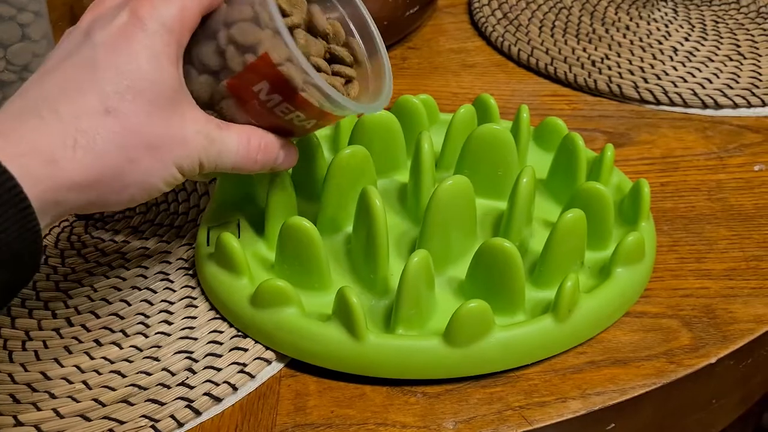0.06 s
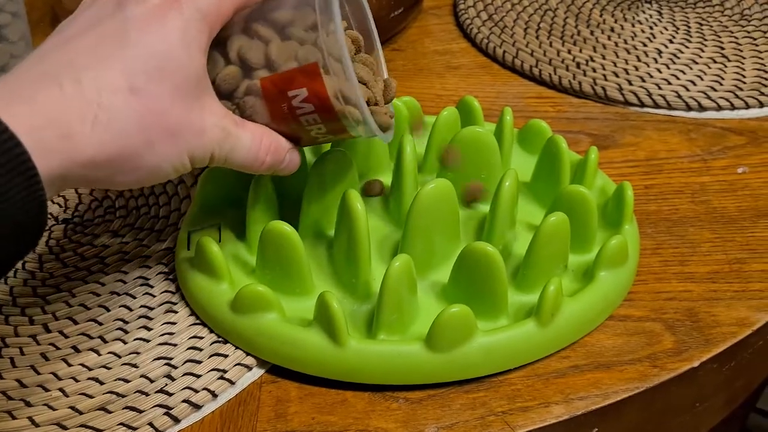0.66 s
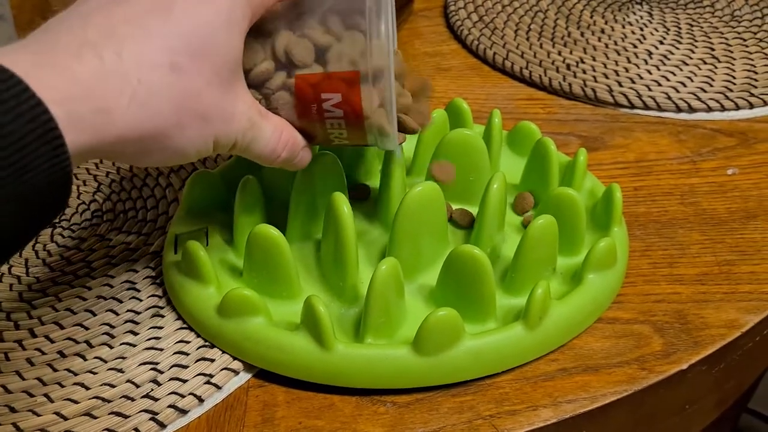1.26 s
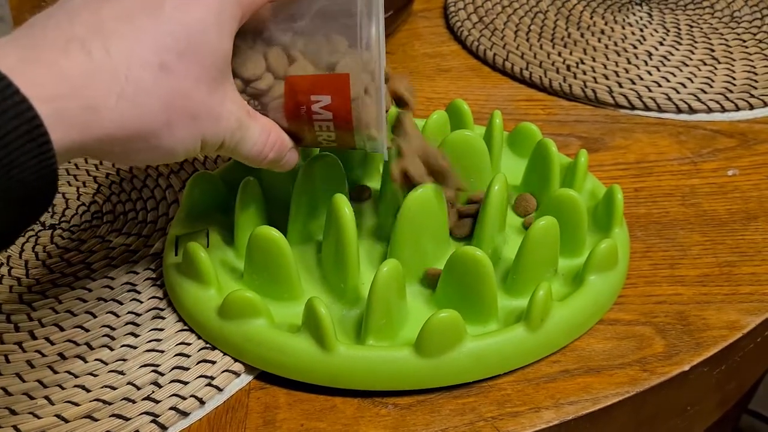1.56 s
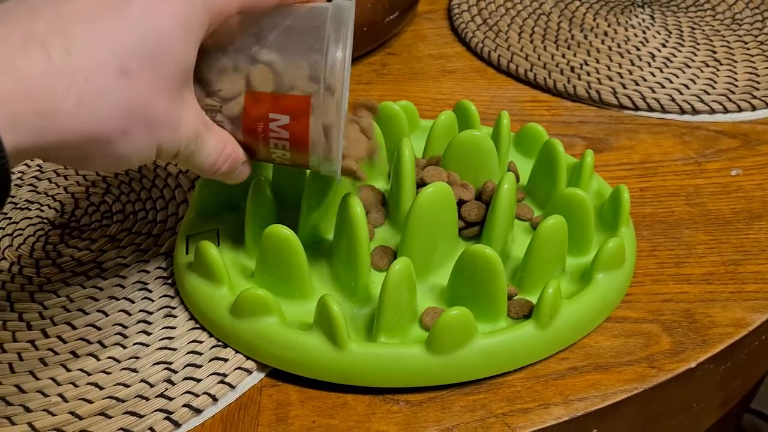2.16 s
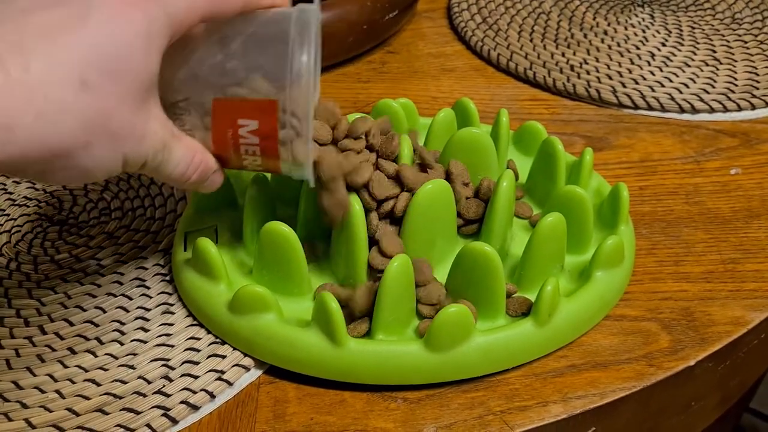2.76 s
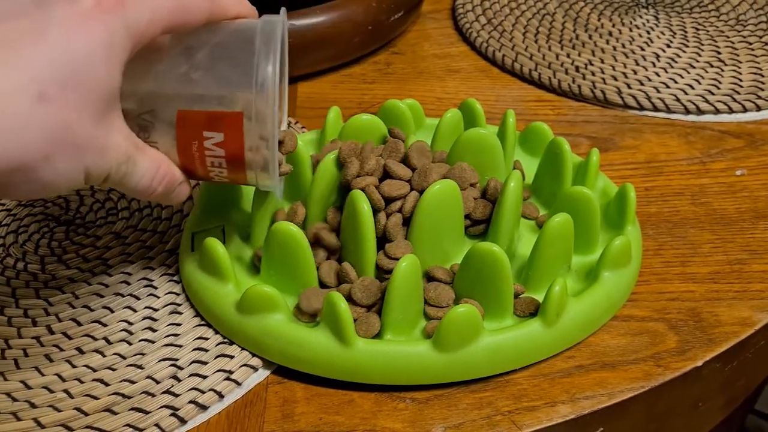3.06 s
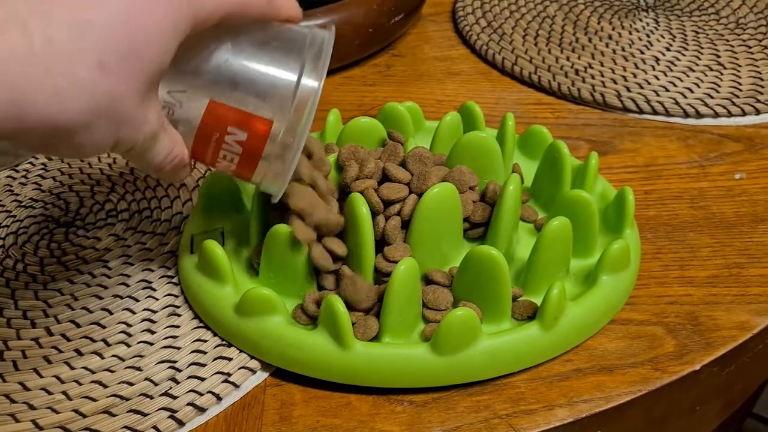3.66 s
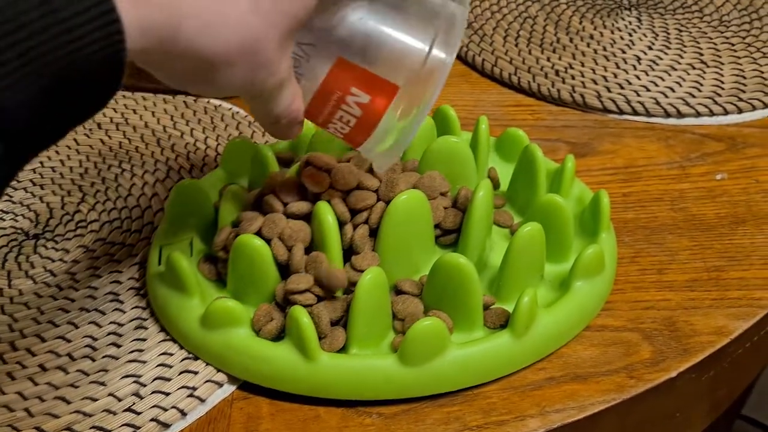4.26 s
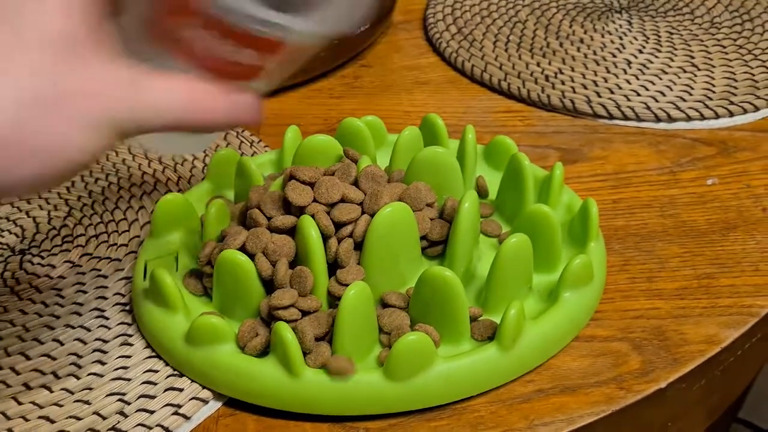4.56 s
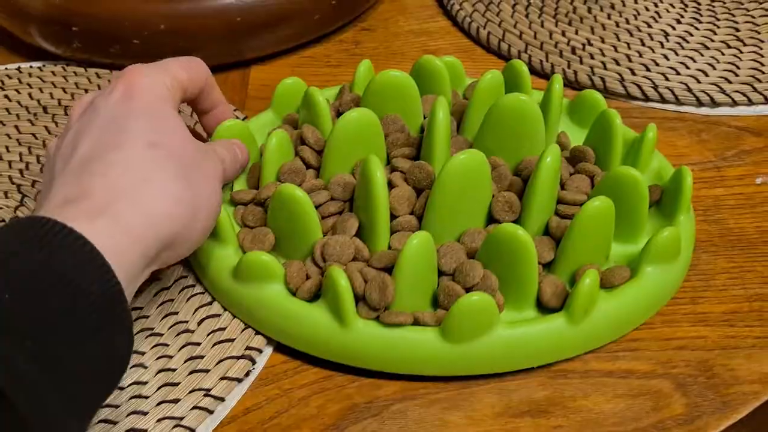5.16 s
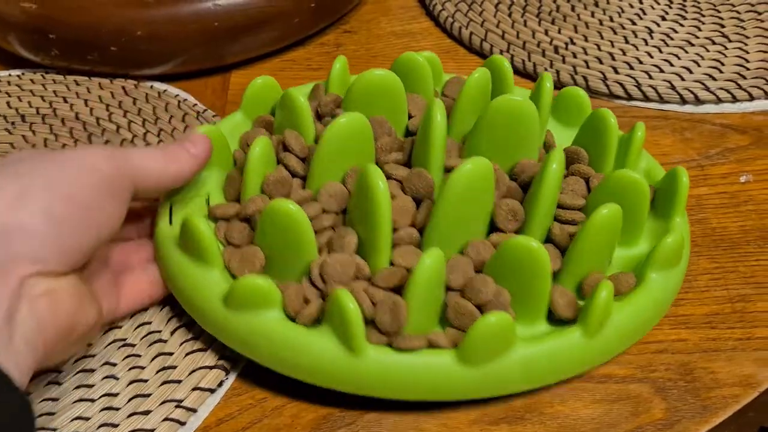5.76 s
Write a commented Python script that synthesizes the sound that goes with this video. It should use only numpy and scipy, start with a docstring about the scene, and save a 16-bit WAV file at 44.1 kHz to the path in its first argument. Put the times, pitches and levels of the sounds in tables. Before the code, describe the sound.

Dry kibble is tipped from a thin plastic tub into a ribbed plastic bowl on a wooden table. A few pieces clack and bounce first, then several gushes merge into a dense, rattling patter with light hollow thuds. The flow stops, stray pieces click, the tub snaps once, and a hand faintly scrapes the bowl along. The sound is close, in stereo, in a small quiet room.

```python
"""Dry kibble pours in gushes from a thin plastic tub into a ribbed plastic bowl on a wooden table.
Hundreds of impacts a second merge into a patter, over which single pieces clack and excite the modes
of the plastic. Those that strike the floor of the bowl make it thud, until the growing heap damps it.
The tub wall snaps, the last pieces rattle, and a hand shifts the bowl with a stick-slip scrape.
Two close microphones pick this up, together with the reverberation of a small room."""
import sys
import numpy as np
from scipy import signal
from scipy.fft import rfft, irfft, next_fast_len
from scipy.io import wavfile
from scipy.ndimage import uniform_filter1d, minimum_filter1d

SR = 44100
rng = np.random.default_rng(int(sys.argv[2]) if len(sys.argv) > 2 else 0)


def to_wav(s):
    """Save 16-bit WAV."""
    ch = np.atleast_2d(s).T  # columns
    pcm = np.round(np.clip(ch, -1, 1) * 32767)  # PCM
    wavfile.write(sys.argv[1], SR, pcm.astype(np.int16))


N = 264501
TIME = np.arange(N) / SR
SAMPLES_PER_MS = SR / 1000  # impact levels state the energy as if spread over 1 ms


def amp(db):
    """Amplitude ratio of a level in decibels."""
    return 10 ** (np.asarray(db) / 20)


def unit_rms(x):
    """Normalisation to a mean power of 1."""
    return x / np.sqrt(np.mean(x ** 2) + 1e-30)


def unit_energy(x):
    """Normalisation to a mean energy of 1 per channel."""
    return unit_rms(x) / np.sqrt(x.shape[-1])


def curve_at(points, hz):
    """Interpolation on a logarithmic frequency axis."""
    frequencies, values = np.transpose(points)
    return np.interp(np.log(hz + 1), np.log(frequencies + 1), values)


def add(mix, start_s, sound):
    """Superposition: a stereo sound adds to the mix from its start time."""
    part = mix[:, max(round(start_s * SR), 0):][:, :sound.shape[1]]
    part += sound[:, :part.shape[1]]


def convolve(x, response):
    """A linear system convolves its input with its impulse response."""
    return signal.oaconvolve(x, response, axes=1)[:, :N]


def minimum_phase(gain_db):
    """Causality: folding the cepstrum onto positive time gives a gain curve its phase."""
    cepstrum = irfft(np.log(amp(np.maximum(gain_db, -100))))
    half = len(cepstrum) // 2
    cepstrum[1:half] *= 2
    cepstrum[half + 1:] = 0
    return np.exp(rfft(cepstrum))


def impulses(per_s, spread_db):
    """A Poisson process of impulses, many small and a few large."""
    height = amp(spread_db * np.minimum(rng.exponential(1, N), 3))
    return height * (rng.random(N) < per_s / SR)


# level difference between the microphones: (frequency [Hz], left minus right [dB])
BALANCE = [(100, -2.5), (400, -1), (800, -1.5), (1300, -1), (2400, -9), (4400, -9.5), (7000, -6.5),
           (15000, -8)]
RIGHT_DELAY_S = 0.0001
def microphone_pair(spectra, hz, coherence):
    """Spaced microphones receive partly coherent signals that differ in level and arrival time."""
    shared = np.clip(curve_at(coherence, hz), -1, 1)
    left = shared * spectra[1] + np.sqrt(1 - shared ** 2) * spectra[0]
    right = spectra[1] * np.exp(-2j * np.pi * hz * RIGHT_DELAY_S)
    balance = amp(curve_at(BALANCE, hz))
    return np.array([left * balance, right]) * np.sqrt(2 / (1 + balance ** 2))


# likeness of the room's field at the two microphones: (frequency [Hz], coherence [0-1])
ROOM_COHERENCE = [(100, 0.53), (300, 1), (650, 0.64), (1400, 0.67), (3000, 0.73), (8000, 0)]
def room_noise(colour):
    """Spectral shaping: white noise takes on a colour and the coherence of the room, at rms 1."""
    padded = next_fast_len(N)
    hz = np.fft.rfftfreq(padded, 1 / SR)
    white = microphone_pair(rfft(rng.standard_normal((2, N)), padded), hz, ROOM_COHERENCE)
    return unit_rms(irfft(white * amp(curve_at(colour, hz)))[:, :N])


# background of the still room: (frequency [Hz], relative level [dB])
AIR_SPECTRUM = [(20, -5.5), (110, 4), (300, 4), (600, -10), (1200, -0.5), (3000, -14.5), (7000, -12.5),
                (9000, -28), (16000, -21.5)]
def room_air():
    """Stationary noise forms the floor beneath all other sounds."""
    return amp(-68.5) * room_noise(AIR_SPECTRUM)


# reverberation time: (frequency [Hz], T60 [s])
ROOM_DECAY = [(200, 0.15), (600, 0.33), (1500, 0.51), (3000, 0.5), (6500, 0.28), (10000, 0.063),
              (16000, 0.81)]
# colour of the reverberant tail: (frequency [Hz], gain [dB])
TAIL_SPECTRUM = [(200, -2), (600, 1.5), (1300, -8), (3000, -10), (6500, -4.5), (12000, -6.5)]
def echoes(size=16384):
    """Impulse response: early reflections from table and bowl, then an exponentially decaying tail."""
    t, hz = np.arange(size) / SR, np.fft.rfftfreq(size, 1 / SR)
    arrived = t > .003
    taps = rng.standard_normal((2, size)) * (rng.random((2, size)) < .12) * arrived
    band_hz, frame_s, bands = signal.stft(taps, SR, nperseg=256)
    decay = amp(-60 * frame_s / curve_at(ROOM_DECAY, band_hz)[:, None])
    tail = signal.istft(bands * decay, SR, nperseg=256)[1][:, :size]
    early = rng.standard_normal((2, size)) * arrived * np.exp(-t / .011)
    spectra = rfft(unit_energy(tail)) * amp(curve_at(TAIL_SPECTRUM, hz))
    spectra += amp(-6.5) * rfft(unit_energy(early))
    return irfft(microphone_pair(spectra, hz, ROOM_COHERENCE))


def reverberation(x, patterns=3, changes_per_s=19):
    """Echo paths depend on source position: pieces land all over the bowl, so patterns crossfade."""
    spot = TIME * changes_per_s
    wet = np.zeros((2, N))
    for k in range(patterns):
        distance = abs((spot - k + patterns / 2) % patterns - patterns / 2)
        share = np.cos(np.pi / 2 * np.minimum(distance, 1))
        wet += convolve(x[1:] * share, echoes())
    return wet * amp([[-.6], [-2.1]])


# response of the wooden table top: (frequency [Hz], relative level [dB])
TABLE_SPECTRUM = [(20, -24.5), (60, -7.5), (110, -12.5), (137, 4), (175, -24.5), (240, -2.5), (320, -17.5)]
def table_murmur():
    """Forced vibration: the table top murmurs in proportion to the flow of kibble."""
    return amp(-26.0) * room_noise(TABLE_SPECTRUM) * flow()


# colour of friction: (frequency [Hz], relative level [dB])
FRICTION_SPECTRUM = [(3300, 2), (4300, -2.5), (6800, -2.5), (8500, -12), (15000, -2)]
# the hand shoves the bowl: (midpoint [s], scrape length [s], scrape level [dB], judder level [dB])
SHOVES = [(4.95, 0.1, -55.5, -68), (5.471, 0.11, -54.5, -70), (5.688, 0.18, -59.5, -70.5),
          (5.808, 0.16, -55.5, -67)]
# low table rumble under the heavy pour (two rows), then rubs and rustles of sleeve, hand and tub:
# (midpoint [s], length [s], level [dB], centre [Hz], half width [octaves])
RUMBLES_AND_RUBS = [(2.477, 0.46, -58, 89.6, 1.2), (2.62, 0.13, -57, 45.6, 0.48),
                    (3.341, 0.072, -42, 1110, 0.69), (4.389, 0.042, -45.5, 660, 1.94),
                    (4.486, 0.063, -51, 606, 1.9), (5.195, 3.4, -70, 388, 0.58),
                    (4.991, .13, -64, 2990, 0.094), (5.263, 0.31, -68.5, 2320, 0.13),
                    (5.434, 0.25, -65.5, 3140, 0.14), (5.461, 2.6, -66.5, 4750, 1.66),
                    (5.805, 0.048, -56.5, 717, 0.096)]
SCRAPE_HZ, SCRAPE_OCTAVES, JUDDER_HZ, JUDDER_OCTAVES = 2480, 1.87, 98, 0.27
def rumble_and_rubbing():
    """Resonance shapes grainy noise into table rumble and the tiny slips of stick-slip friction."""
    out = np.zeros((2, N))
    grains = rng.standard_normal((2, N)) * (0.51 + impulses(per_s=900, spread_db=5.0))
    scrapes = [(middle, length, db, SCRAPE_HZ, SCRAPE_OCTAVES) for middle, length, db, _ in SHOVES]
    judders = [(middle, 2 * length, db, JUDDER_HZ, JUDDER_OCTAVES) for middle, length, _, db in SHOVES]
    for middle, length, db, centre_hz, octaves in RUMBLES_AND_RUBS + scrapes + judders:
        size, start = int(length * SR), middle - length / 2
        padded = next_fast_len(size)
        hz = np.fft.rfftfreq(padded, 1 / SR)
        resonance = (1 + (np.log2((hz + 1) / centre_hz) / octaves) ** 2) ** -1.4
        spectra = microphone_pair(rfft(grains[:, round(start * SR):], padded), hz, ROOM_COHERENCE)
        band = irfft(spectra * resonance * amp(curve_at(FRICTION_SPECTRUM, hz)), padded)[:, :size]
        add(out, start, amp(db) * unit_rms(band) * np.sin(np.linspace(0, np.pi, size)))
    return out


# likeness of the direct sound at the two microphones: (frequency [Hz], coherence [0-1])
DIRECT_COHERENCE = [(100, .7), (300, 0.96), (700, 1), (1400, 0.87), (3000, 0.13), (7000, 0.051),
                    (15000, 0.71)]
def radiated(force, body_db):
    """Source and filter: a brief force radiates through the response of a body, at energy 1."""
    size = force.shape[1]
    spectra = microphone_pair(rfft(force), np.fft.rfftfreq(size, 1 / SR), DIRECT_COHERENCE)
    fade = np.hanning(2 * size)[size:]
    return unit_energy(irfft(spectra * minimum_phase(body_db)) * fade)


# colour of a snap: (frequency [Hz], relative level [dB])
SNAP_SPECTRUM = [(100, -59.5), (400, -23), (1200, -7.5), (3500, -2), (5200, -1), (6500, 2.5), (8000, -12),
                 (11000, -12.5), (15000, -28)]
# the tub wall snaps under the fingers: (time [s], level [dB])
SNAPS = [(0.1187, -27), (0.5497, -24), (4.5984, -16.5), (4.8823, -35.5), (4.942, -30)]
def wall_snaps(size=1024):
    """Snap-through buckling: the thin wall flips in an instant and radiates one bright impulse."""
    impulse = np.zeros((2, size))
    impulse[:, 16] = 1
    crack = radiated(impulse, curve_at(SNAP_SPECTRUM, np.fft.rfftfreq(size, 1 / SR)))
    out = np.zeros((2, N))
    for start, db in SNAPS:
        add(out, start, amp(db) * crack)
    return out * np.sqrt(SAMPLES_PER_MS)


def ringing(drive, modes, size=12000):
    """Modal response: a shell rings as a sum of damped sinusoids, scaled to the rms of its drive."""
    t = np.arange(size) / SR
    response = sum(amp(db - 60 * t / t60) * np.sin(2 * np.pi * hz * t) / np.sqrt(t60)
                   for hz, db, t60 in modes)
    return unit_rms(convolve(drive, response[None])) * np.sqrt(np.mean(drive ** 2))


# modes of the bowl: (frequency [Hz], relative energy [dB], T60 [s])
BOWL_MODES = [(313, 6, .26), (338, -2, .16), (412, -5, .16), (521, -5, .18), (629, -7, .22), (785, -3, .16),
              (863, -5, .14)]
def bowl(thuds):
    """Resonance: the low modes of the bowl prolong each thud."""
    return amp(-4.0) * thuds + amp(-8.5) * ringing(thuds, BOWL_MODES)


# modes of the tub: (frequency [Hz], relative energy [dB], T60 [s])
TUB_MODES = [(1153, -21, 0.11), (1280, 3, 0.083), (1334, 15.5, 0.058), (1670, -28, 0.065),
             (2810, 13.5, 0.17), (3140, -13.5, .08)]
def tub(clatter):
    """Resonance: the high, short-lived modes of the tub colour the clatter."""
    return clatter + amp(-16.0) * ringing(clatter, TUB_MODES)


def contact(colour, time_constant_s, pitch_hz=None, octaves=.75, size=1024):
    """Rough contact: a noisy force swells and dies in milliseconds; the spot struck favours a pitch."""
    t, hz = np.arange(size) / SR, np.fft.rfftfreq(size, 1 / SR)
    age = t / time_constant_s
    swell = age ** 2 * np.exp(-age) + .07 * np.exp(-age / 4)
    body_db = curve_at(colour, hz)
    if pitch_hz:
        body_db -= 20 * np.log10(1 + (np.log2((hz + 1) / pitch_hz) / octaves) ** 2)
    return radiated(rng.standard_normal((2, size)) * swell, body_db)


def ping(pitch_hz, cycles, size=1024):
    """Damped oscillation: the struck rib or wall rings for a few cycles."""
    t, balance = np.arange(size) / SR, amp(curve_at(BALANCE, pitch_hz))
    phase = 2 * np.pi * (pitch_hz * (t + np.array([[RIGHT_DELAY_S], [0]])) + rng.random())
    attack = (1 - np.exp(-t / 0.0017)) ** 2
    motion = np.sin(phase) * attack * np.exp(-t * pitch_hz / cycles)
    pressure = np.gradient(motion, axis=1)  # a small surface radiates little bass
    return unit_energy(np.array([[balance], [1]]) * pressure)


# colours of a piece's body, its edge and the bowl's floor: (frequency [Hz], relative level [dB])
CLACK_SPECTRUM = [(120, -56.5), (300, -26.5), (500, -12), (750, -14), (980, -13.5), (1270, 0), (1650, -0.5),
                  (2100, -1), (2650, 0), (3300, 0), (4200, -10), (5500, -14), (9000, -28.5)]
TICK_SPECTRUM = [(2000, -42), (3800, -16), (4600, -4), (5500, 0), (6800, -3), (8200, -17), (11000, -21),
                 (16000, -30)]
THUD_SPECTRUM = [(60, -56), (200, -23.5), (283, -33.5), (305, 0.5), (420, 6.5), (560, -3), (800, 4),
                 (1400, -25.5)]
# pieces hit tub, ribs or heap, and at 2.53 s the tub's rim bumps a rib of the bowl: # (time [s], clack level
# [dB], pitch [Hz], tick level [dB])
KNOCKS = [(0.2206, -13.5, 1460, -24.5), (0.2439, -15, 1360, -34.5), (0.2817, -25.5, 1450, -35.5),
          (0.4184, -28, 1420, -47.5), (0.4665, -13.5, 2630, -31), (0.4968, -12, 3164, -31),
          (0.611, -17.5, 2430, -33), (0.6477, -6, 1707, -17.5), (0.7077, -14, 2560, -25.5),
          (0.9255, -29, 2610, -35), (0.9761, -29.5, 1180, -53), (1.021, -35, 2680, -63),
          (1.2524, -8.5, 2630, -17.5), (1.3149, -19.5, 1250, -28), (1.45, -10.5, 3450, -13.5),
          (1.5448, -10.5, 3304, -23), (1.5652, -10.5, 2416, -20), (1.6633, -8.5, 2910, -18.5),
          (1.7346, -13.5, 2620, -26), (1.7794, -16, 1308, -30), (1.932, -27.5, 2560, -56.5),
          (1.994, -25, 1630, -22.5), (2.0697, -26, 3175, -26), (2.151, -16.5, 1630, -31.5),
          (2.2393, -13, 3450, -22.5), (2.247, -17.5, 2500, -23.5), (2.297, -6, 2513, -6.5),
          (2.362, -11.5, 1690, -21), (2.5303, -9, 785, -39), (2.5421, -13, 2560, -17.5),
          (2.564, -7.5, 2426, -15.5), (2.6469, -9.5, 2460, -25.5), (2.6648, -21.5, 1670, -14.5),
          (2.8496, -11.5, 2930, -12), (2.9281, -11, 2840, -31.5), (3.0322, -17, 3000, -21),
          (3.082, -18.5, 1670, -27.5), (3.1933, -33, 1950, -42), (3.4351, -18, 2500, -25),
          (3.6337, -13.5, 3130, -25), (3.7616, -17.5, 2690, -25), (3.9055, -15.5, 2910, -29),
          (3.9635, -14.5, 1810, -24), (4.1013, -32.5, 1660, -64), (4.1605, -30, 1840, -37.5),
          (4.215, -17.5, 2976, -35), (4.229, -12.5, 2490, -29), (4.32, -29.5, 3140, -42.5),
          (4.327, -23.5, 1450, -62), (4.5119, -35, 1547, -50.5), (4.5793, -32, 2560, -43.5),
          (4.6912, -35, 2510, -51), (4.7864, -41, 1257, -67)]
# pieces hit the bare floor of the bowl: (time [s], clack level [dB], pitch [Hz], thud level [dB])
LANDINGS = [(0.5289, -10.5, 1340, -20.5), (0.6456, -8, 1625, -15.5), (0.7333, -5, 2450, -19),
            (0.7376, -24.5, 1870, -19), (0.7557, -16, 2160, -24), (0.8462, -14, 2540, -24),
            (0.865, -21, 2340, -26.5), (1.3303, -11.5, 3195, -22), (1.385, -9.5, 1740, -20),
            (1.4391, -11.5, 2800, -22.5), (1.4947, -17.5, 2860, -27.5), (1.5516, -11, 1640, -22),
            (1.5939, -12, 2580, -21), (1.6936, -17, 2610, -28), (2.0142, -16, 1192, -27.5),
            (2.18, -16, 1616, -27)]
# the hard edges of two pieces meet: (time [s], level [dB])
EDGE_TICKS = [(0.5485, -19), (1.141, -32), (1.4, -18.5), (1.827, -19), (2.2295, -18), (2.2868, -12.5),
              (2.4168, -17.5), (2.4275, -12), (2.9587, -15.5), (3.57, -17.5)]
KNOCK_THUD_DB, LANDING_TICK_DB = -30, -12.5  # relative to the clack
def single_impacts():
    """Impact sound: each loud piece gives a clack, a tick and a thud; edges alone only tick."""
    clatter, thuds = np.zeros((2, 2, N))
    knocked = [(start, db, hz, tick_db, db + KNOCK_THUD_DB) for start, db, hz, tick_db in KNOCKS]
    landed = [(start, db, hz, db + LANDING_TICK_DB, thud_db) for start, db, hz, thud_db in LANDINGS]
    for start, clack_db, pitch_hz, tick_db, thud_db in knocked + landed:
        clack = contact(CLACK_SPECTRUM, 0.00056, pitch_hz, octaves=2.1)
        clack += amp(-3.0) * ping(pitch_hz, cycles=3.0)
        add(clatter, start, amp(clack_db) * unit_energy(clack))
        add(clatter, start, amp(tick_db) * contact(TICK_SPECTRUM, 0.00023))
        add(thuds, start, amp(thud_db) * contact(THUD_SPECTRUM, 0.00078))
    for start, db in EDGE_TICKS:
        add(clatter, start, amp(db) * contact(TICK_SPECTRUM, 0.00025))
    return np.array([clatter, thuds]) * np.sqrt(SAMPLES_PER_MS)


def heap_cushioning(bare_db=-10.5, full_loss_db=25.5):
    """Damping: the heap grows with all that has been poured and weakens the thud of the stream."""
    poured = np.cumsum(flow() ** 2)
    return amp(bare_db - full_loss_db * np.sqrt(poured / poured[-1]))


# gushes and trickles from the tub: (start [s], end [s], clack level [dB], tick level [dB])
GUSHES = [(0.096, 0.467, -49.5, -57.5), (0.464, 0.866, -37, -45), (0.862, 1.124, -49, -75),
          (1.372, 1.79, -26, -36), (1.931, 2.1, -37.5, -51.5), (2.197, 2.636, -24.5, -35.5),
          (2.579, 3.05, -26, -37.5), (3.279, 3.346, -37.5, -45.5), (3.398, 4.033, -27.5, -41),
          (4.19, 4.343, -50.5, -69)]
def flow(ticks=False, attack_s=0.092, sag_db_per_s=16, release_db_per_s=182.5):
    """Incoherent gushes add in power, giving the envelope of the stream's clacks or of its ticks."""
    power = np.zeros(N)
    for start, end, clack_db, tick_db in GUSHES:
        since_start, since_end = np.maximum(TIME - start, 0), np.maximum(TIME - end, 0)
        rise = np.minimum(since_start / attack_s, 1)
        fall_db = sag_db_per_s * since_start + release_db_per_s * since_end
        power += (rise * amp((tick_db if ticks else clack_db) - fall_db)) ** 2
    return np.sqrt(power)


def kibble_stream(kinds=40, full_flow_db=-27):
    """Shot noise: dense impacts merge into a patter; below full flow they thin to separate pieces."""
    pitches_hz = 2000 * np.exp(0.62 * rng.standard_normal(kinds))
    pieces = [(contact(CLACK_SPECTRUM, 0.00036, hz, octaves=0.81),
               contact(TICK_SPECTRUM, 0.00088),
               contact(THUD_SPECTRUM, 0.00072)) for hz in pitches_hz]
    density = np.clip(flow() / amp(full_flow_db), 0.02, 1) ** 0.6
    strength = impulses(per_s=850, spread_db=3.5)
    strength *= (rng.random(N) < density) / np.sqrt(density)  # fewer impacts at equal mean power
    kind = rng.integers(0, kinds, N)
    hardness_db = 2.6 * np.clip(rng.standard_normal(N), -2, 2)
    clacks, ticks, thuds = np.zeros((3, 2, N))
    for i in np.flatnonzero(strength):
        clack, tick, thud = pieces[kind[i]]
        add(clacks, i / SR, strength[i] * clack)
        add(ticks, i / SR, strength[i] * amp(hardness_db[i]) * tick)
        add(thuds, i / SR, np.sqrt(strength[i]) * thud)
    clatter = unit_rms(clacks) * flow() + unit_rms(ticks) * flow(ticks=True)
    return np.array([clatter, unit_rms(thuds) * flow() * heap_cushioning()])


def scene():
    """Superposition: the direct sound, its reverberation and the background add up."""
    clatter, thuds = single_impacts() + kibble_stream()
    direct = tub(clatter + wall_snaps()) + bowl(thuds) + rumble_and_rubbing()
    return direct + reverberation(direct) + table_murmur() + room_air()


def record(dry, ceiling_db=1.5, cutoff_hz=16200):
    """Peak limiting turns down the hardest impacts; a low-pass filter then bounds the bandwidth."""
    needed_gain = np.minimum(amp(ceiling_db) / (abs(dry).max(0) + 1e-9), 1)
    gain = uniform_filter1d(minimum_filter1d(needed_gain, size=181), size=151)
    low_pass = signal.firwin(511, cutoff_hz, window=("kaiser", 9), fs=SR)
    return signal.oaconvolve(dry * gain, low_pass[None], "same")


dry = scene()
out = record(dry)
to_wav(out)
```